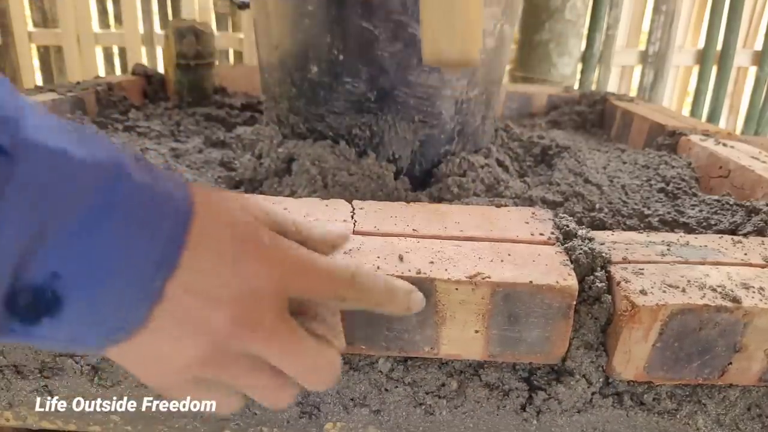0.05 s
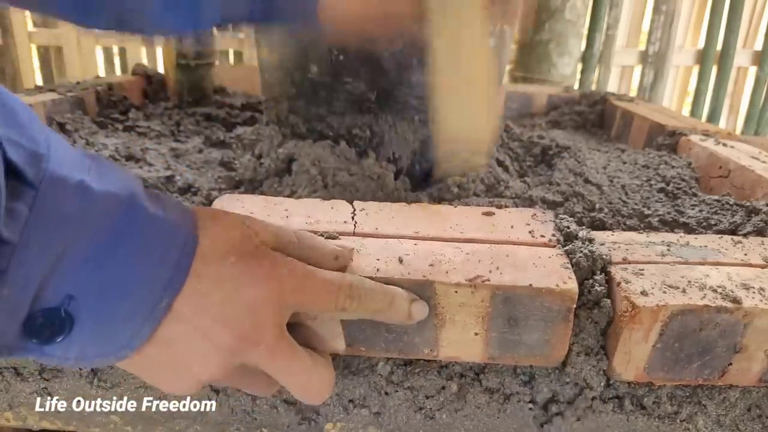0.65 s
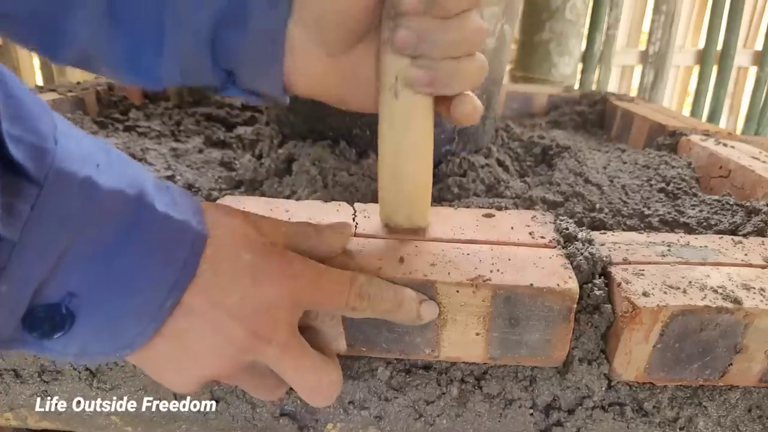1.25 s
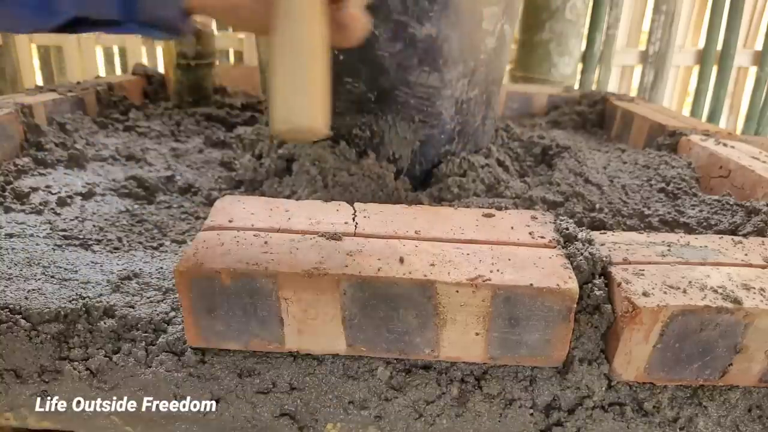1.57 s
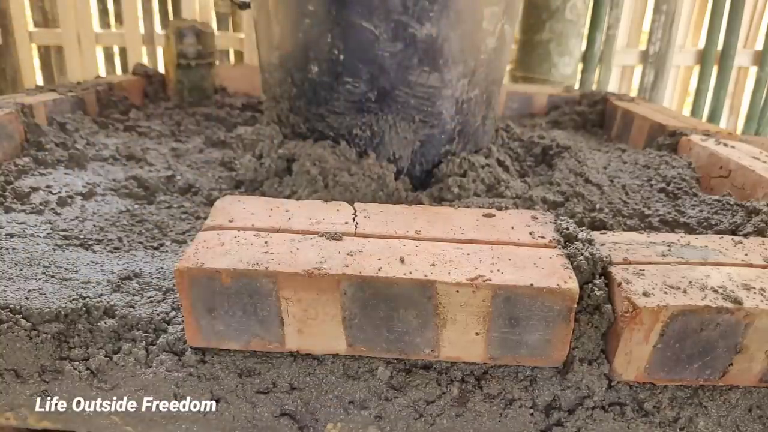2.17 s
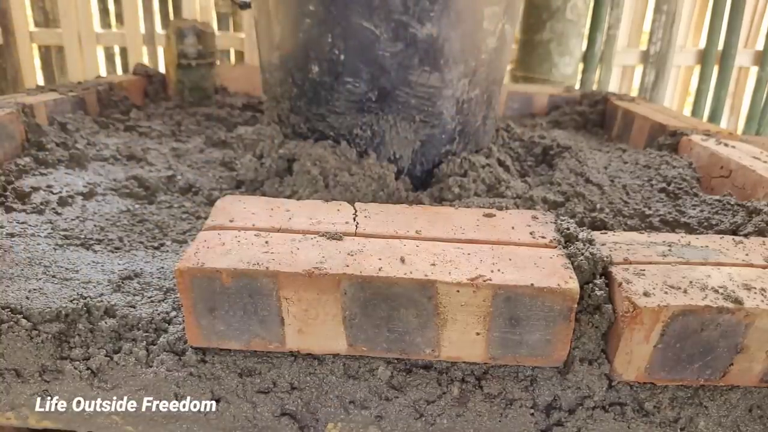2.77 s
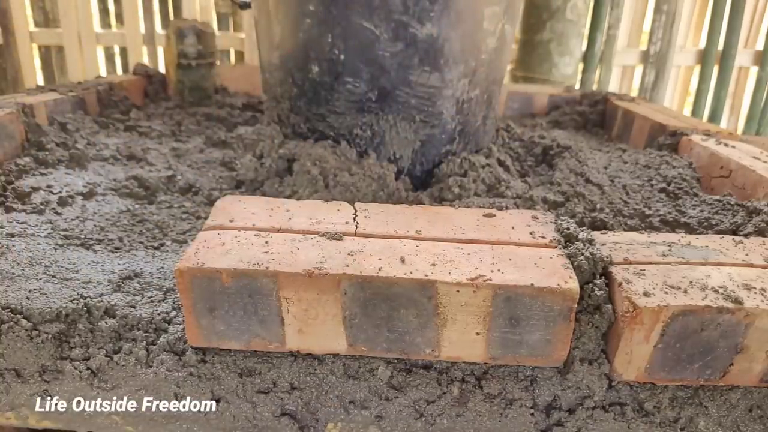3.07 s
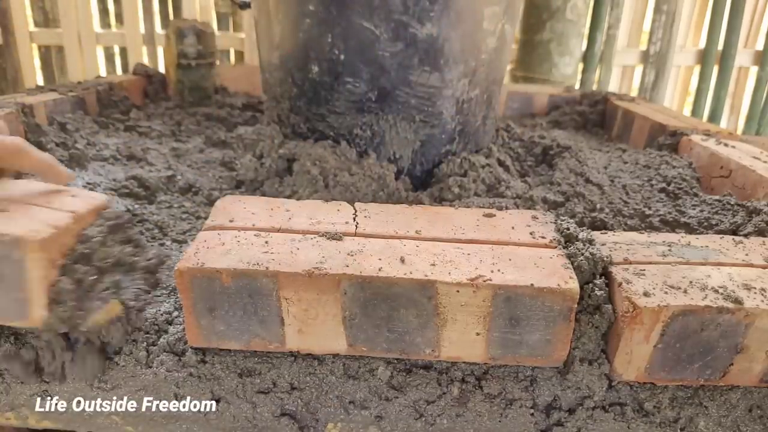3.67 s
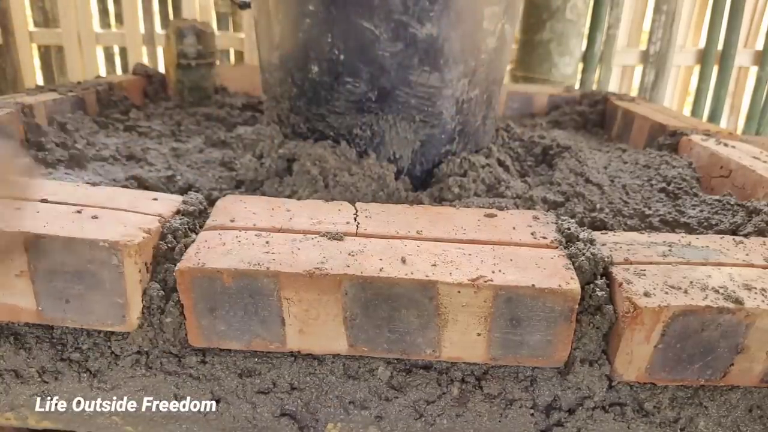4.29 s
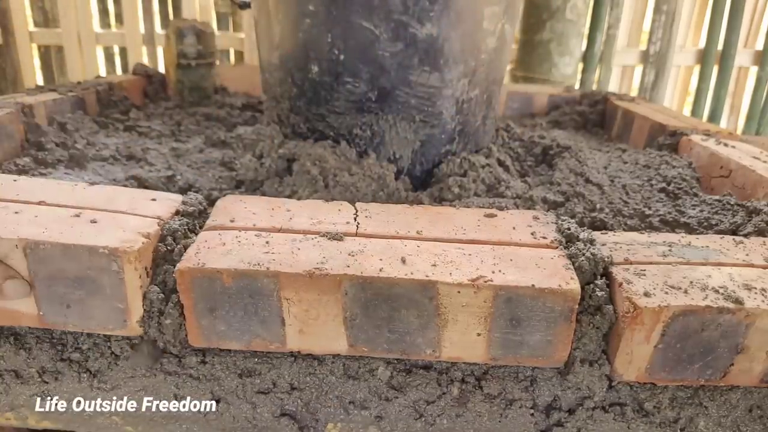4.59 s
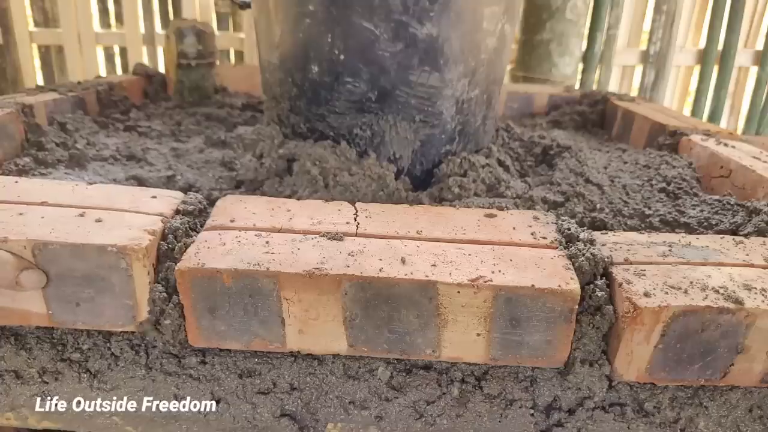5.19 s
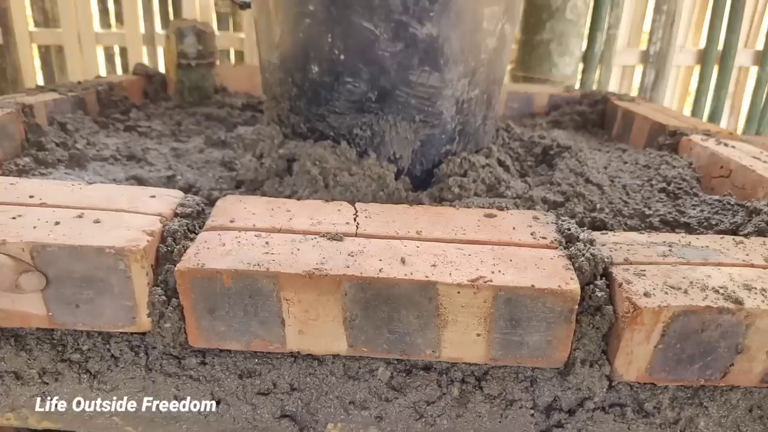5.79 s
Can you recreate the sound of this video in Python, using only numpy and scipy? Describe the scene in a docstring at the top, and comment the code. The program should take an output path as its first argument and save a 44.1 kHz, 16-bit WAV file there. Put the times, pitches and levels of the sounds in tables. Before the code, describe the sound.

Five firm taps on a brick, a soft gritty scrape of wet mortar, then five lighter taps on another brick.

```python
"""A bricklayer beds two bricks in wet mortar with the butt of a wooden tool handle, over quiet site air.
First come five firm taps in front; close walls answer each, crumbs tick and nearby steel rings faintly.
From 1.6 s, amid soft handling knocks, a trowel scoops gritty mortar; from 3.3 s it spreads it,
and the second brick is pressed home. From 4.8 s five taps to the left seat that brick."""
import sys
import numpy as np
from scipy import signal
from scipy.fft import rfft, irfft, next_fast_len
from scipy.io import wavfile
from scipy.ndimage import uniform_filter1d, map_coordinates

SR = 44100
rng = np.random.default_rng(int(sys.argv[2]) if len(sys.argv) > 2 else 0)


def dump(signal):
    """Clip the signal to [-1, 1] and save it as 16-bit WAV at the path in sys.argv[1]."""
    limited = np.clip(np.atleast_2d(signal).T, -1, 1)
    pcm = np.round(limited * 32767).astype(np.int16)
    wavfile.write(sys.argv[1], SR, pcm)


N = 257984


def amp(db):
    """Decibels to gain."""
    return 10 ** (np.asarray(db) / 20)


def unit(x):
    """Scale to rms 1."""
    return x / np.sqrt(np.mean(x ** 2) + 1e-20)


def along(points, hz):
    """Interpolate (frequency, value) points on a log axis."""
    point_hz, values = np.transpose(points)
    return np.interp(np.log(hz + 1), np.log(point_hz + 1), values)


def wobble(rate_hz):
    """Smooth random curve, rate_hz knots a second."""
    knots = rng.standard_normal(int(N * rate_hz / SR) + 4)
    return map_coordinates(knots, [np.arange(N) * rate_hz / SR])


def coloured(x, level_db):
    """Minimum-phase filter with gain level_db(hz)."""
    n = x.shape[-1]
    size = 2 * next_fast_len(n)
    gain = amp(level_db(np.fft.rfftfreq(size, 1 / SR)))
    cepstrum = irfft(np.log(gain + 1e-6))
    cepstrum[1:size // 2] *= 2
    cepstrum[size // 2 + 1:] = 0
    return irfft(rfft(x, size) * np.exp(rfft(cepstrum)))[..., :n]


def add(track, start_s, sound):
    """Mix a sound into the track."""
    part = track[:, round(start_s * SR):][:, :sound.shape[-1]]
    part += sound[..., :part.shape[1]]


def from_left(x, lead_ms, pan_db):
    """Sound from the left reaches the left channel earlier and louder."""
    late = np.pad(x[1], (round(lead_ms * SR / 1000), 0))[:x.shape[1]]
    return np.array([x[0] * amp(pan_db / 2), late * amp(-pan_db / 2)])


def diffuse(size, mono_hz):
    """Stereo white noise, alike in both channels below mono_hz."""
    mid, side = rfft(rng.standard_normal((2, size)))
    coherence = 1 / (1 + (np.fft.rfftfreq(size, 1 / SR) / mono_hz) ** 2)
    angle = np.arccos(coherence) / 2
    mid, side = mid * np.cos(angle), side * np.sin(angle)
    return irfft([mid + side, mid - side], size)


def ring(modes, rise_cycles, spread_hz, vary_db):
    """1 s of damped modes; low ones build slowly, high ones differ in phase between channels."""
    t = np.arange(SR) / SR
    out = np.zeros((2, SR))
    for k, (hz, db, t60_s) in enumerate(modes):
        skew_rad = np.array([[.5], [-.5]]) * min(hz / spread_hz, np.pi / 2)
        decay = amp(db + vary_db * rng.normal() - 60 * t / t60_s)
        attack = 1 - np.exp(-t * hz / rise_cycles)
        out += (-1) ** k * decay * attack * np.sin(2 * np.pi * hz * t + skew_rad)
    return out


def force(x, db, thud_db, hardness_db):
    """A heavier blow swells the bass, a harder contact the treble."""
    def level_db(hz):
        bass_db = thud_db / (1 + (hz / 420) ** 4)
        treble_db = hardness_db / (1 + (2400 / (hz + 1)) ** 4)
        return db + bass_db + treble_db
    return coloured(x, level_db)


# Background spectrum: (frequency [Hz], relative density [dB])
AIR_SPECTRUM = [(20, -24.5), (45, -1.5), (130, -1.5), (300, -9), (700, -17.5), (1500, -21), (4000, -17),
                (7500, -11.5), (9500, -14), (15300, -10), (16000, -22)]

def air():
    """Quiet, steady site background."""
    return amp(-69.5) * unit(coloured(diffuse(N, mono_hz=500), lambda hz: along(AIR_SPECTRUM, hz)))


# Handling knocks: (time [s], level [dB], frequency [Hz])
KNOCKS = [(.282, -47, 448.5), (1.538, -52.5, 331), (1.723, -49, 233), (1.779, -55, 129), (1.841, -53, 54.3),
          (2.121, -59, 275)]

def knocks():
    """Dull, quickly damped knocks as the hands take hold and move away."""
    out = np.zeros((2, N))
    t = np.arange(SR // 4) / SR
    attack = 1 - np.exp(-t / .00082)
    for time_s, db, hz in KNOCKS:
        decay = amp(db - 60 * t * hz / 9)  # 60 dB in 9 cycles
        add(out, time_s, attack * decay * np.sin(2 * np.pi * hz * t))
    return out


# Nearby steel: (frequency [Hz], relative level [dB], t60 [s])
STEEL_MODES = [(802, -14.5, 1.1), (1605, 1, .27), (1709, 1, .33), (1787, 1, .31), (2347, 0, .24),
               (2455, 3, .27), (3261, -1, .26)]

def steel():
    """Each tap wakes a faint, long ring in nearby steel, more so on hard contact."""
    out = np.zeros((2, N))
    for time_s, db, thud_db, hardness_db in FRONT_BLOWS + LEFT_BLOWS:
        ringing = ring(STEEL_MODES, rise_cycles=3, spread_hz=3900, vary_db=5.5)
        add(out, time_s, force(ringing, db + .3 * hardness_db, thud_db, hardness_db))
    return amp(-47) * out


def grains(spectrum, rate_hz, spread_db, rub_gain):
    """Uneven sand grains snapping over a smooth rub, rms 1."""
    hits = rng.random(N) < rate_hz / SR
    sizes = amp(spread_db * np.minimum(rng.standard_normal(N), 2))
    snaps = unit(hits * sizes * diffuse(N, mono_hz=350))
    rub = rub_gain * diffuse(N, mono_hz=430)
    return unit(coloured(snaps + rub, lambda hz: along(spectrum, hz)))


# Breaking grain: (frequency [Hz], relative density [dB])
SNAP_SPECTRUM = [(1500, -26), (4000, -12), (7500, -3), (9000, -5.5), (12000, 1.5), (15300, 2.5),
                 (16500, -8.5)]
# Collapsing clumps: (time [s], relative peak [dB], low crunch offset [dB])
CLUMPS = [(.9398, -38.5, -27), (.9544, -38.5, -19), (1.4022, -37.5, -21.5), (1.6452, -48.5, -31),
          (2.1974, -43, -30), (2.597, -32, -24), (2.6144, -31.5, -15), (2.7412, -34.5, -15),
          (3.271, -31, -24.5), (4.0342, -34.5, -16), (4.0612, -36, -31), (4.0846, -35.5, -31),
          (4.1126, -40, -36), (4.2173, -35, -26.5), (4.2334, -40, -26), (4.2802, -42, -19.5),
          (4.4762, -25.5, -27), (4.4934, -32.5, -35), (4.8156, -28, -33), (5.009, -35.5, -35),
          (5.3083, -38, -34)]

def grit(snap_t60_s=.0055, spray_t60_s=.04):
    """Sand clumps give way: one sharp snap, then a spray of smaller ones."""
    crunch_env, fizz_env, snap_env = np.zeros((3, 1, N))
    t = np.arange(SR // 4) / SR
    for time_s, db, low_db in CLUMPS:
        spray = amp(db - 60 * t / spray_t60_s) * (1 - np.exp(-t / .00056))
        add(snap_env, time_s, amp(db - 60 * t / snap_t60_s))
        add(fizz_env, time_s, spray)
        add(crunch_env, time_s, spray * amp(low_db))
    snaps = amp(-3.5) * coloured(snap_env * rng.standard_normal((2, N)),
                                 lambda hz: along(SNAP_SPECTRUM, hz))
    fizz = amp(-4) * fizz_env * grains(SNAP_SPECTRUM, rate_hz=2400, spread_db=3.5, rub_gain=.7)
    crunch = amp(7) * crunch_env * grains(SPREAD_SPECTRUM, rate_hz=1600, spread_db=10.5, rub_gain=.7)
    return from_left(snaps + fizz + crunch, lead_ms=.2, pan_db=5)


def crumbs(rate_hz, life_s):
    """Grains shaken loose by a blow tick briefly."""
    chance = rate_hz / SR * np.exp(-np.arange(SR) / SR / life_s)
    ticks = (rng.random(SR) < chance) * rng.uniform(-1, 1, (2, SR))
    return coloured(ticks, lambda hz: along(SNAP_SPECTRUM, hz))


def blade_gaps(x, depth_db):
    """Short-lived resonances as gaps open and close under the blade."""
    spectra = signal.stft(x, nperseg=512)[2]
    patches = uniform_filter1d(rng.standard_normal(spectra.shape[1:]), size=4, axis=0)
    patches = uniform_filter1d(patches, size=12, axis=1)
    return unit(signal.istft(spectra * amp(depth_db * unit(patches)), nperseg=512)[1][:, :N])


def push(start_s, length_s, swell_db, attack_s=.06, release_t60_s=.19):
    """Stroke pressure: builds, swells or eases while held, lets go."""
    t = np.arange(N) / SR - start_s
    attack = np.sin(np.pi / 2 * np.clip(t / attack_s, 0, 1)) ** 2
    held_db = swell_db * (np.clip(t / length_s, 0, 1) - .5)
    release_db = -60 * np.maximum(t - length_s, 0) / release_t60_s
    return attack * amp(held_db + release_db)


# Fine sand sliding: (frequency [Hz], relative density [dB])
HISS_SPECTRUM = [(1500, -13.5), (4000, -3), (7500, -1), (9000, -3.5), (12000, 1), (15300, 0), (16500, -11)]

def strokes(rows, spectrum):
    """Drags through wet sand: each push drives a broad rasp under a fine hiss."""
    rasp_power, hiss_power = np.zeros((2, N))
    for start_s, length_s, rasp_db, hiss_db, swell_db in rows:
        pressure = push(start_s, length_s, swell_db)
        rasp_power += (amp(rasp_db) * pressure) ** 2
        hiss_power += (amp(hiss_db) * pressure) ** 2
    rasp = blade_gaps(grains(spectrum, rate_hz=1500, spread_db=5, rub_gain=.9), depth_db=2.5)
    hiss = grains(HISS_SPECTRUM, rate_hz=3000, spread_db=5.5, rub_gain=1)
    return np.sqrt(rasp_power) * rasp + np.sqrt(hiss_power) * hiss


# Blade in the heap; mortar spread thin: (frequency [Hz], relative density [dB])
SCOOP_SPECTRUM = [(59, -36), (100, -17), (318, -8.5), (393, -9), (707, -4.5), (1140, -3), (1390, -4.5),
                  (1750, -2), (1910, -1), (7000, -13), (9100, -33), (15400, -120)]
SPREAD_SPECTRUM = [(120, -51), (200, -12.5), (421, -12), (567, 1), (629, -6), (1430, -1), (1610, -6.5),
                   (2130, -0.5), (7000, -7), (9100, -33), (15400, -120)]
# Mortar strokes: (start [s], length [s], relative rasp [dB], relative hiss [dB], swell [dB])
SCOOP_STROKES = [(1.625, 0.344, -72, -69, -4.5), (2.12, .3, -74, -65.5, 5.5),
                 (2.385, .155, -60.5, -53, 2.5), (2.575, 0.046, -40.5, -42.5, 1),
                 (2.61, .265, -58.5, -53, -10), (2.92, .09, -60, -51, 0.5)]
SPREAD_STROKES = [(3.28, .19, -56.5, -51, 8.5), (3.45, 0.51, -54.5, -52.5, -3.5),
                  (3.875, .082, -49, -52.5, 2), (3.995, 0.049, -55.5, -58, -2.5),
                  (4.06, .38, -81.5, -64.5, -9.5), (4.455, 0.47, -71, -60, -16.5),
                  (4.81, .14, -61.5, -60, 0.5), (4.99, 0.13, -78, -64, 5), (5.1, 0.096, -87, -53, -2)]

def mortar():
    """The trowel scoops and spreads, sticking and slipping; the left brick squeezes the bed."""
    stick_slip = amp(2.5 + .7 * wobble(rate_hz=63) + .65 * wobble(rate_hz=14))
    scooping = strokes(SCOOP_STROKES, SCOOP_SPECTRUM)
    spreading = strokes(SPREAD_STROKES, SPREAD_SPECTRUM)
    return from_left(stick_slip * (scooping + spreading), lead_ms=.3, pan_db=4.2)


def echoes(decay, rise_s, mono_hz):
    """1 s of dense, spectrally flat reflections; decay is (frequency [Hz], t60 [s])."""
    hz, t, spectra = signal.stft(diffuse(SR, mono_hz), SR, nperseg=256)
    fade = amp(-60 * t / along(decay, hz)[:, None])
    tail = signal.istft(spectra * fade, SR, nperseg=256)[1][:, :SR]
    tail *= 1 - np.exp(-np.arange(SR) / SR / rise_s)
    power = abs(uniform_filter1d(np.mean(abs(rfft(tail)) ** 2, axis=0), size=220))
    return coloured(tail, lambda f: -10 * np.log10(np.interp(f, np.arange(len(power)), power) + 1e-12))


# Close walls; far yard: (frequency [Hz], t60 [s])
WALL_DECAY = [(100, .2), (400, 0.11), (1500, 0.076), (4000, 0.12), (8000, 0.098), (15000, .13)]
YARD_DECAY = [(200, 0.34), (1500, 0.17), (4000, 0.37), (10000, .22)]

def tap(modes, crack, scatter, click_db, walls_db, yard_db, modes_db):
    """One blow: contact, scatter off neighbouring bricks, near and far echoes, brick modes."""
    contact = amp(click_db) * signal.unit_impulse(SR)
    walls = amp(walls_db) * echoes(WALL_DECAY, rise_s=.008, mono_hz=900)
    yard = amp(yard_db) * echoes(YARD_DECAY, rise_s=.011, mono_hz=400)
    body = amp(modes_db) * ring(modes, rise_cycles=.6, spread_hz=6500, vary_db=.6)
    return coloured(contact + scatter + walls + yard, lambda hz: along(crack, hz)) + body


# Bedded brick with handle: (frequency [Hz], relative level [dB], t60 [s])
LEFT_BRICK_MODES = [(74.7, -19.5, .18), (239.8, -14.5, .05), (281.5, -4, 0.067), (342.4, -15.5, .08),
                    (401.4, -21.5, 0.14), (635, -17.5, 0.11), (856, 1, 0.032), (950, 4.5, 0.031),
                    (1201, -31, 0.023), (1706, 1, 0.017), (2110, -3, 0.0066), (2260, -19, 0.14),
                    (2778, -14, 0.058), (3260, -13, 0.16), (3530, -24, 0.11), (4680, -23.5, 0.12),
                    (4934, -20.5, 0.09)]
# Dense crack: (frequency [Hz], relative density [dB])
LEFT_CRACK_SPECTRUM = [(30, -49.5), (280, -1), (520, -6), (900, -5), (1700, 3), (2500, -3.5), (3700, -2.5),
                       (4200, -8), (4900, -16.5), (5800, -15), (8500, -23), (15500, -25)]
# Taps: (time [s], gain [dB], thud [dB], hardness [dB])
LEFT_BLOWS = [(4.8146, -1, -7.5, -9), (5.1282, -3, -1, -13.5), (5.3634, -0.5, 2, -1),
              (5.5739, -0.5, 0, -4.5), (5.7923, -0.5, 0.5, -0.5)]

def left_brick():
    """Five lighter handle taps to the left, firmer as the brick seats."""
    out = np.zeros((2, N))
    scatter_decay = [(200, .032), (1500, .069), (5000, .022), (12000, .029)]
    scatter = amp(15) * echoes(scatter_decay, rise_s=.001, mono_hz=700)
    for time_s, db, thud_db, hardness_db in LEFT_BLOWS:
        blow = tap(LEFT_BRICK_MODES, LEFT_CRACK_SPECTRUM, scatter,
                   click_db=13.5, walls_db=13.5, yard_db=-3.5, modes_db=-12)
        ticks = amp(-39.5) * crumbs(rate_hz=40, life_s=.14)
        add(out, time_s, force(blow, db, thud_db, hardness_db) + ticks)
    return from_left(out, lead_ms=.38, pan_db=.5)


# Bedded brick with handle: (frequency [Hz], relative level [dB], t60 [s])
FRONT_BRICK_MODES = [(80, -11, 0.19), (135.2, -30.5, 0.053), (228, -2.5, 0.051), (273, -6.5, 0.11),
                     (400, -12, 0.13), (450, -19, 0.078), (656, -8.5, 0.084), (755, -4.5, 0.091),
                     (1040, -22, 0.063), (1621, -1.5, 0.13), (1752, -10, .085), (1774, -12.5, 0.19),
                     (2330, -11.5, .09), (2890, -23.5, .1), (3165, -17, 0.14), (3253, -11.5, 0.16),
                     (3300, -12.5, 0.16), (3740, -6.5, 0.12), (4040, -14.5, .1), (4630, -9, 0.12),
                     (4960, -6, .1), (5824, -27.5, .11), (6340, -29.5, .1), (7500, -28.5, .11)]
# Dense crack: (frequency [Hz], relative density [dB])
FRONT_CRACK_SPECTRUM = [(30, -38), (220, -1), (500, -1), (750, -2), (1200, -3.5), (1700, 6), (2700, -5.5),
                        (3400, -3.5), (4200, -10), (5000, -3.5), (5500, -21.5), (7900, -16), (8700, -31),
                        (15500, -26.5)]
# Taps: (time [s], gain [dB], thud [dB], hardness [dB])
FRONT_BLOWS = [(0.3084, 0, 3.5, 2), (0.53, 0, 2.5, -1), (.7709, 0, 3, 2), (1.0111, -0.5, 4.5, 4),
               (1.262, 0, 1, 2)]

def front_brick():
    """Five firm handle taps close in front."""
    out = np.zeros((2, N))
    scatter_decay = [(200, .053), (1500, .014), (5000, .03), (12000, .036)]
    scatter = amp(18.5) * echoes(scatter_decay, rise_s=.0018, mono_hz=1100)
    for time_s, db, thud_db, hardness_db in FRONT_BLOWS:
        blow = tap(FRONT_BRICK_MODES, FRONT_CRACK_SPECTRUM, scatter,
                   click_db=9, walls_db=13, yard_db=-2, modes_db=-15)
        ticks = amp(-36.5) * crumbs(rate_hz=45, life_s=.15)
        add(out, time_s, force(blow, db, thud_db, hardness_db) + ticks)
    return from_left(out, lead_ms=.045, pan_db=1.4)


def scene():
    """Both bricks, mortar work and background."""
    return front_brick() + left_brick() + steel() + mortar() + grit() + knocks() + air()


def record(dry):
    """Soft peak limiter, then a sharp low-pass."""
    ceiling, cutoff_hz = .98, 15900
    limited = dry / (1 + abs(dry / ceiling) ** 8) ** (1 / 8)
    size = next_fast_len(N + SR // 2)
    passband = np.fft.rfftfreq(size, 1 / SR) < cutoff_hz
    return irfft(rfft(limited, size) * passband, size)[:, :N]


dry = scene()
out = record(dry)
dump(out)
```